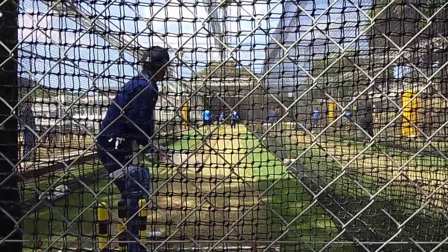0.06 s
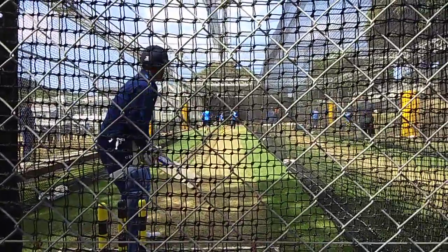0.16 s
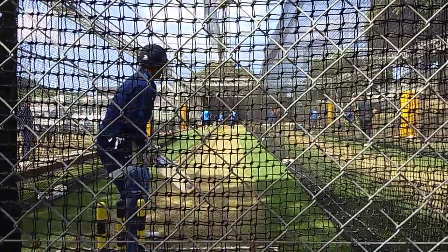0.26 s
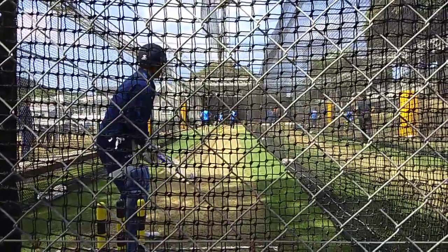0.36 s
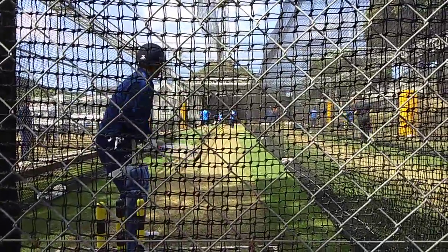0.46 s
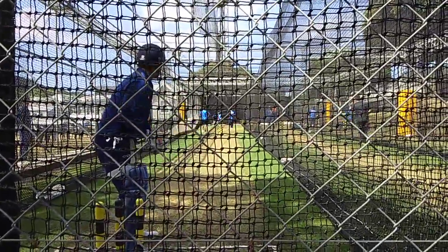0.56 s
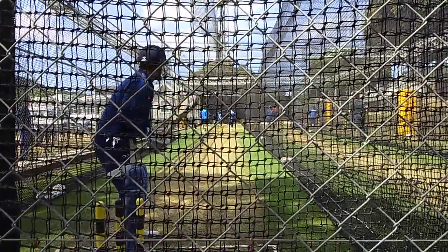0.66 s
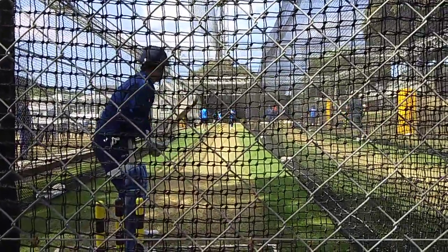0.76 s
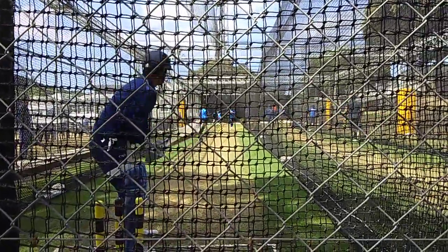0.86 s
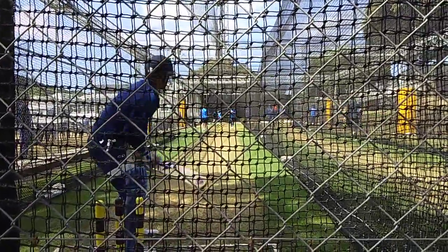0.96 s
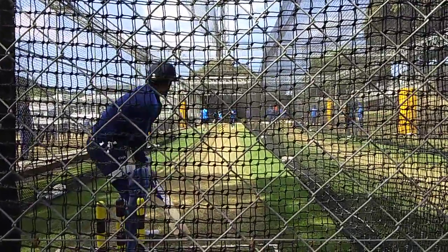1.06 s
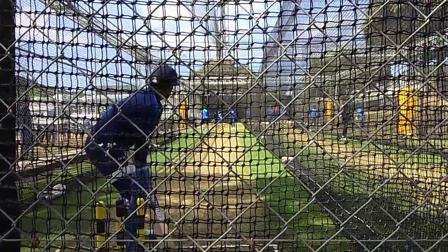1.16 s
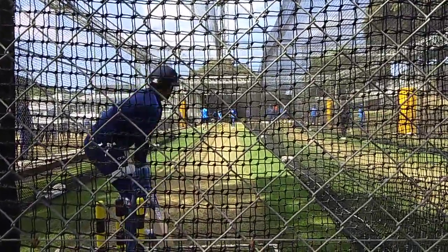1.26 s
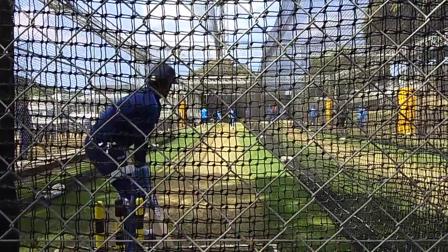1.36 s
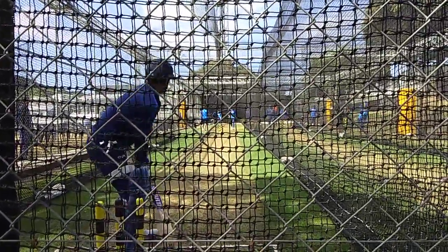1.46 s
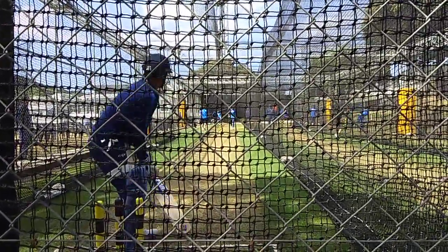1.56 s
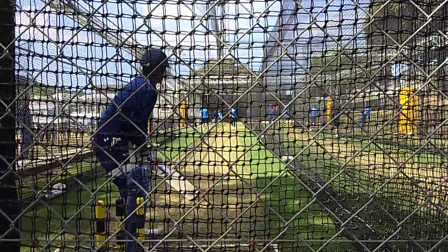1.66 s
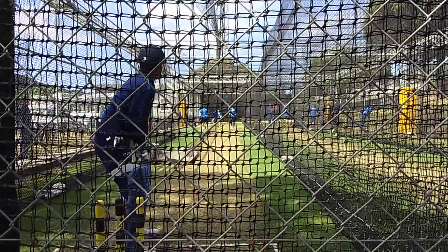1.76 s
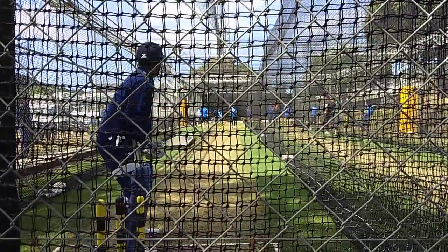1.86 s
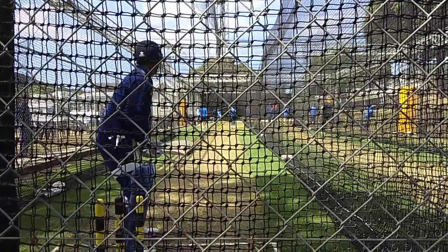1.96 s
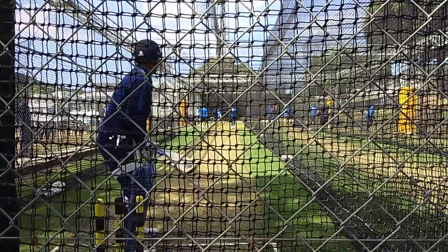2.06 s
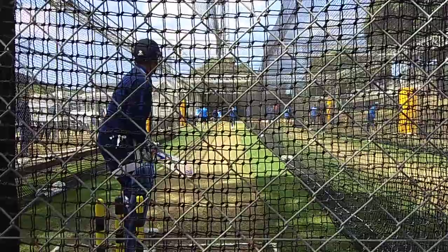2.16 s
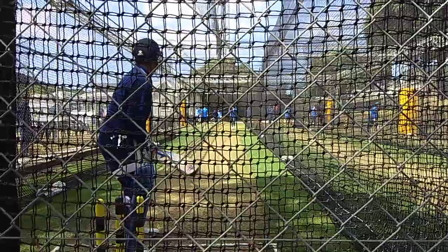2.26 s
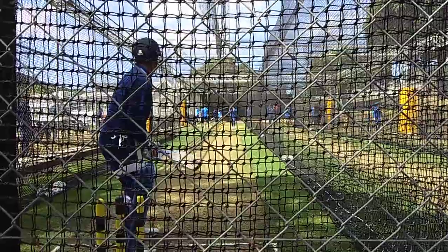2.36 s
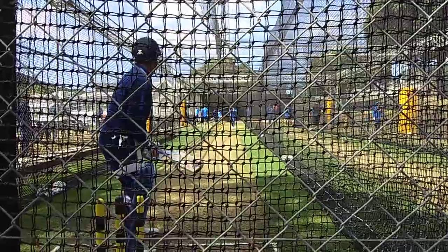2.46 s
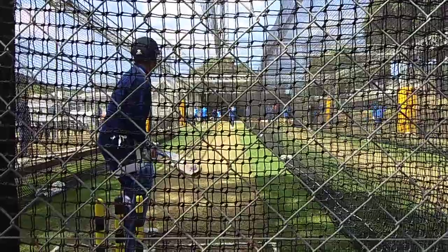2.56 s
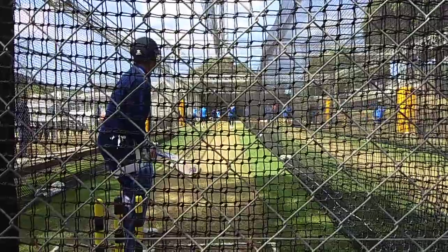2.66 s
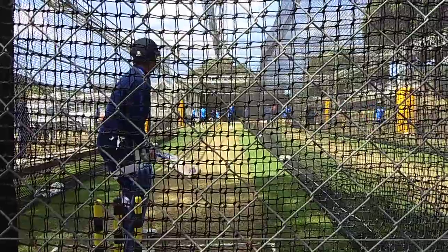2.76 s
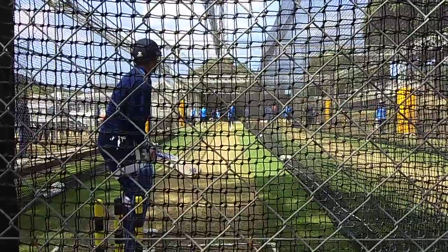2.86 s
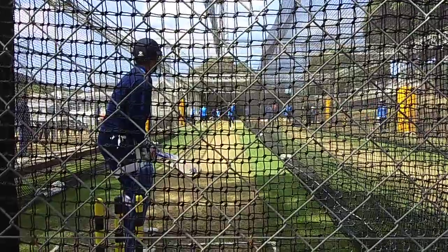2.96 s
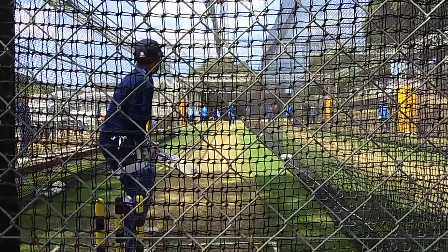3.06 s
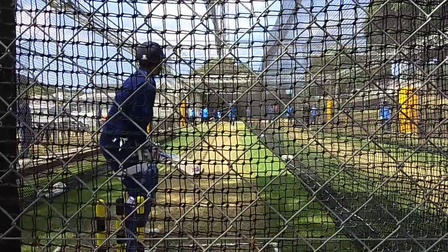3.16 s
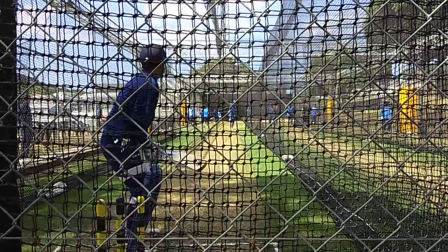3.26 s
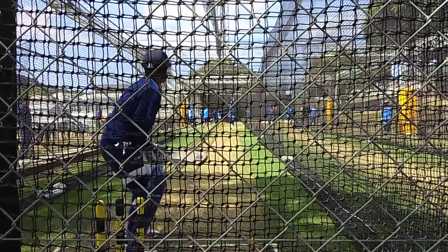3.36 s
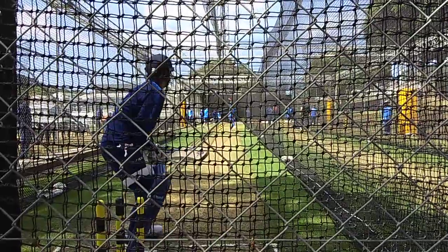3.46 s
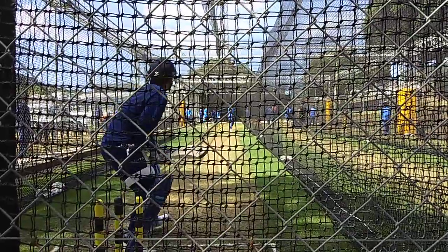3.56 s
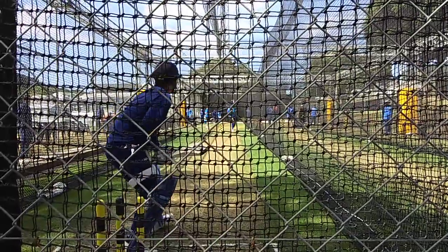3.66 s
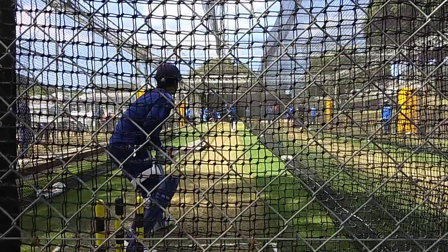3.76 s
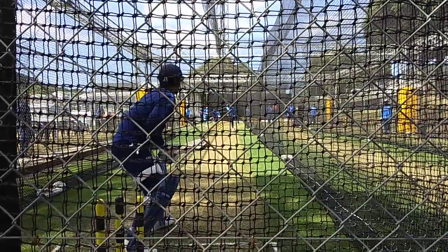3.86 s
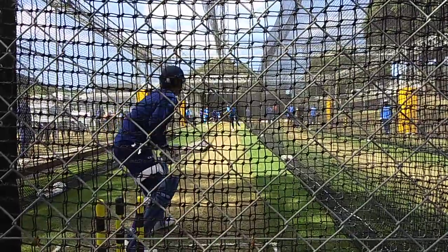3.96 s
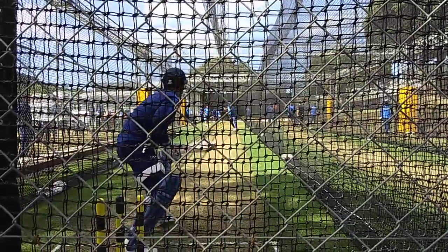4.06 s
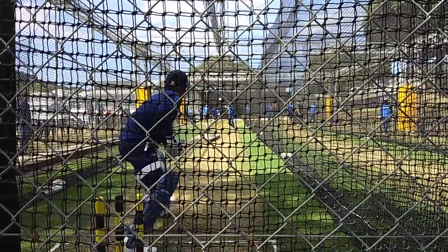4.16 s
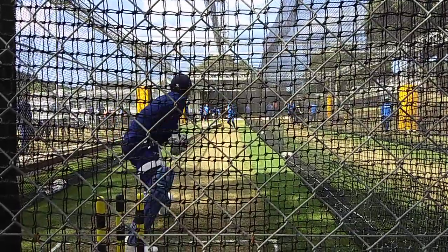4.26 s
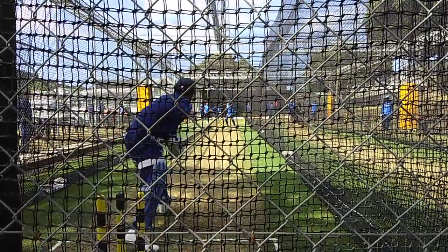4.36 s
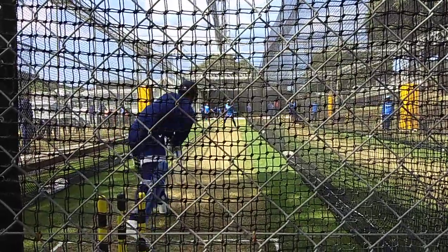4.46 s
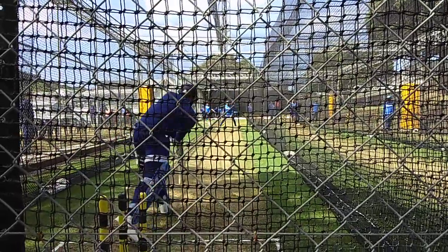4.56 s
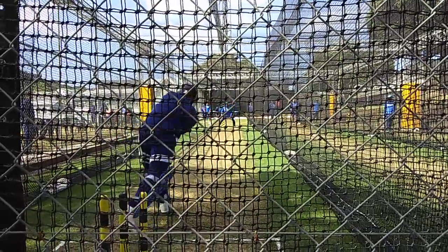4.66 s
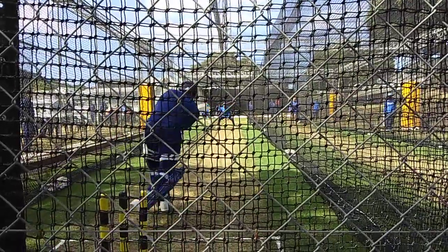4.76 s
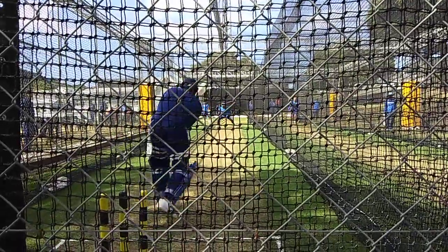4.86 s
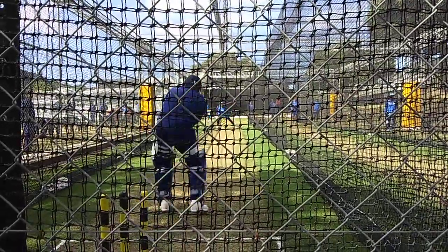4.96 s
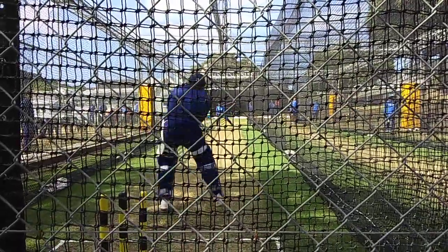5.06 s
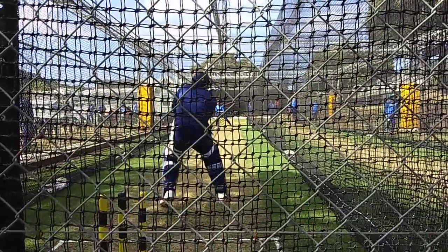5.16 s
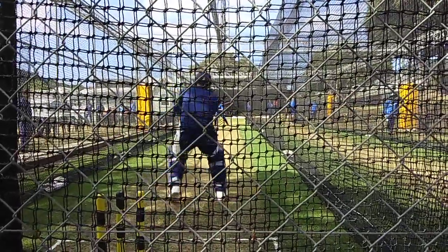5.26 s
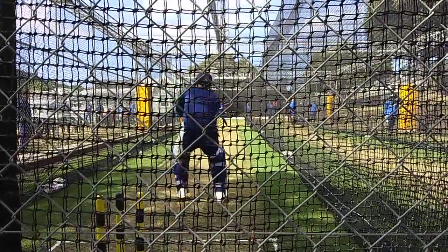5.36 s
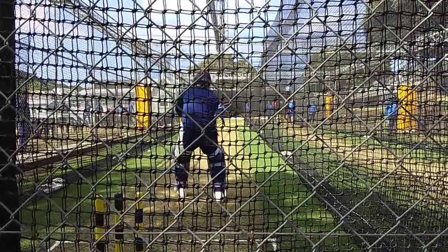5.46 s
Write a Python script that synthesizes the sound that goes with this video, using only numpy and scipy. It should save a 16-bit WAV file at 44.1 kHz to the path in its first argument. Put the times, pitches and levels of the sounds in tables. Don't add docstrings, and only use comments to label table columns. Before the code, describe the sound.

Wooden bat taps thud softly in outdoor cricket nets, then two sharp ball-on-bat cracks ring out with rattling echoes over a distant town rumble.

```python
import sys
import numpy as np
from scipy import signal
from scipy.fft import rfft, irfft, next_fast_len
from scipy.io import wavfile
from scipy.ndimage import uniform_filter1d

SR = 44100
rng = np.random.default_rng(int(sys.argv[2]) if len(sys.argv) > 2 else 0)


def log_audio(samples):
    frames = np.atleast_2d(samples).T
    limited = np.clip(frames, -1, 1)
    pcm = np.round(limited * 32767).astype(np.int16)
    wavfile.write(sys.argv[1], SR, pcm)


def level_to_linear(level):
    exponent = np.asarray(level, float) / 20
    return 10 ** exponent


N = 243431
T = np.arange(N) / SR
SPLIT_HZ = 8000
HALVES = np.array([[.5], [-.5]])


def on_log(table, hz):
    point_hz, value = np.transpose(table)
    return np.interp(np.log(np.maximum(hz, 1)), np.log(point_hz), value)


def colour(x, table, lo_hz, hi_hz):
    size = next_fast_len(N)
    hz = np.arange(size // 2 + 1) * SR / size
    gain = level_to_linear(on_log(table, hz)) * (hz >= lo_hz) * (hz < hi_hz)
    y = irfft(rfft(x, size) * gain, size)[..., :N]
    return y / np.sqrt(np.mean(y ** 2))


def walk(rate):
    hold = int(SR / rate)
    steps = np.repeat(rng.standard_normal(N // hold + 1), hold)
    return uniform_filter1d(uniform_filter1d(steps, hold), hold)[:N]


def add_ring(out, s, db, hz, rise_ms, swing, lag_ms, soft):
    start = int(s * SR) - 40
    at = np.arange(start, min(N, start + 2600))
    t = np.maximum(at / SR - s - HALVES * lag_ms / 1000, 0)
    u = t / (rise_ms / 1000)
    out[:, at] += swing * level_to_linear(db) * (u * np.exp(1 - u)) ** soft * np.sin(2 * np.pi * hz * t)


def town():
    # pitch in Hz, level in dB per Hz.
    spectrum = [(15, -50), (25, -42), (40, -23), (55, -2), (107, 1.5), (148, -7.5), (261, -2), (425, -15),
                (881, -10.5), (1360, -16), (2150, -17.5), (3050, -29), (6140, -32), (7630, -47),
                (15800, -38)]
    # pitch in Hz, how alike left and right are (1 = the same).
    likeness = [(60, .98), (290, 0.99), (640, 0.91), (1400, 0.28), (3100, 0.053), (7000, .05)]
    # pitch in Hz, left minus right in dB.
    ports = [(60, -0.5), (110, -0.5), (200, 0), (380, 0.0), (700, 0.5), (1290, 0.5), (2380, 1.0),
             (4400, 1.5), (8120, 9), (15000, 3)]
    # pitch in Hz, spread of the patches in dB.
    mottle = [(60, 3.5), (200, 5), (700, 3.5), (2000, 4.5), (4000, 3.0), (12000, 4)]
    # time in
    # seconds, level in dB.
    bustle = [(0.0, -51), (0.52, -48), (0.83, -49.5), (1.34, -47.5), (1.66, -51.5), (2.09, -39.5),
              (2.26, -50), (2.49, -47.5), (2.86, -45), (2.97, -44.5), (3.32, -50), (3.8, -49),
              (4.18, -46.5), (4.63, -47), (5.0, -50.5), (5.52, -45)]
    edges_hz = [15, 90, 450, 2800, 16000]
    # mean level in dB, share of the bustle it follows, own drift in dB, fade in dB per second.
    layers = [
        (-53.5, 0.58, 3, -0.56),
        (-49, 0.92, 2.5, -0.03),
        (-49, 0.18, 1.15, .5),
        (-61, .1, 1.7, 0.04),
    ]
    lead_ms = 0.19

    hz, _, (mid, side) = signal.stft(rng.standard_normal((2, N)), SR, nperseg=1024)
    hz, sides = hz[:, None], np.array([1, -1])[:, None, None]
    like = np.clip(on_log(likeness, hz), 0, 1)
    pair = mid * np.sqrt(1 + like) + sides * side * np.sqrt(1 - like)
    pair = pair * level_to_linear(on_log(spectrum, hz) + sides * on_log(ports, hz) / 2)
    pair = pair * np.exp(1j * np.pi * sides * hz * lead_ms / 1000)
    patches = uniform_filter1d(rng.standard_normal(mid.shape), size=3, axis=0)
    patches = uniform_filter1d(patches, size=4, axis=1)
    pair = pair * level_to_linear(on_log(mottle, hz) * patches / patches.std())

    bustle_db = np.interp(T, *np.transpose(bustle))
    bustle_db = bustle_db - bustle_db.mean()
    out = 0
    for lo, hi, (db, share, drift_db, fade_db) in zip(edges_hz, edges_hz[1:], layers):
        part = signal.istft(pair * (hz >= lo) * (hz < hi), SR, nperseg=1024)[1][:, :N]
        level_db = db + share * bustle_db + drift_db * walk(5.44) - fade_db * (T - T.mean())
        out = out + part / np.sqrt(np.mean(part ** 2)) * level_to_linear(level_db)
    return out


def insect():
    # time in seconds, level in dB.
    song = [(0, -78), (.3, -81), (.9, -67), (1.1, -63), (1.8, -67.5), (2.1, -66.5), (3, -72), (5.52, -76)]
    line = signal.lfilter(*signal.iirpeak(3580, 60, fs=SR), rng.standard_normal((2, N)))
    return line / line.std() * level_to_linear(np.interp(T, *np.transpose(song)) + 6.1 * walk(7.3) - 3.5)


def footsteps():
    # time in seconds, peak in dB, thud pitch in Hz.
    steps = [(0.016, -35, 290), (0.254, -37.5, 109), (0.359, -37, 108), (0.466, -35.5, 93),
             (0.54, -36, 58.7), (0.572, -34, 260), (0.94, -35.5, 255), (1.111, -38.5, 246),
             (1.466, -34.5, 255), (1.59, -40, 312), (1.747, -33.5, 170), (2.602, -38, 300),
             (2.821, -24, 129), (2.954, -33.5, 257), (3.008, -37, 177), (3.043, -33, 190), (3.30, -41, 62),
             (3.349, -33.5, 189), (3.681, -32.5, 175), (3.876, -37.5, 197), (3.944, -35, 127),
             (4.135, -35, 228), (4.314, -39, 110), (4.382, -33, 109), (4.914, -36, 134),
             (5.017, -38.5, 129), (5.163, -35.5, 119), (5.237, -34, 121), (5.276, -34, 197),
             (5.49, -38, 131)]
    out = np.zeros((2, N))
    for s, db, hz in steps:
        add_ring(out, s + .003, db, hz, rise_ms=1.05 * 1000 / hz, swing=-1, lag_ms=-.1, soft=1.8)
    return out


def taps():
    # time in seconds, peak in dB, thud pitch in Hz, rise in ms, blade ring in dB over the thud.
    lanes = [
        [(1.2356, -8, 285, 2.6, -26), (2.7852, -9.5, 180, 2.9, -40), (4.5436, -18, 255, 2.6, -40)],
        [(2.0189, -9, 315, 2.9, -12), (1.9522, -26, 320, 1.8, 2), (2.7945, -8, 290, 2.6, -15),
         (3.5712, -19, 275, 2.8, -24)],
    ]
    lane_lags_ms = [
        0.13,
        -0.2,
    ]
    out = np.zeros((2, N))
    for lag_ms, lane in zip(lane_lags_ms, lanes):
        for s, db, hz, rise_ms, blade_db in lane:
            add_ring(out, s, db, hz, rise_ms, -1, lag_ms, soft=2.8)
            add_ring(out, s, db + blade_db, 781, 1.17, -1, lag_ms, soft=0.76)
    return out


def ground_return(thuds):
    t = T[:int(.4 * SR)]
    same, other = rng.standard_normal((2, len(t)))
    returns = same + 0.15 * other * np.array([[1], [-1]])
    returns = returns * level_to_linear(-60 * t / 0.31) * (t > .008)
    return thuds + level_to_linear(-41) * signal.fftconvolve(thuds, returns, axes=1)[:, :N]


def lane_treble():
    # pitch in Hz, level in dB per Hz.
    colours = [
        [(1180, -30), (2000, -4.5), (3730, -14.5), (4670, -14), (5090, -16), (6100, -7.5), (7510, -22.5),
         (10700, -5.5), (12200, -7.5), (14900, -5.5), (15800, -6)],
        [(1180, -36), (2000, 2.5), (3360, 3.5), (4060, 2), (4790, 0.5), (6480, -1.5), (8260, -17), (10200, -5),
         (12500, -8), (14100, 2.5), (15800, 1)],
    ]
    noise = rng.standard_normal((2, 2, N))
    mids = [colour(noise[0], lane, 2000, SPLIT_HZ) for lane in colours]
    tops = [colour(noise[1], lane, SPLIT_HZ, SR / 2) for lane in colours]
    return mids, tops


def hiss_bursts(mids, tops):
    # middle in seconds, mid band in dB, its pitch in Hz, above 8 kHz in dB,
    # left minus right in dB.
    snaps = [(1.239, -57.5, 5400, -61, 8), (1.670, -52.5, 4900, -51, 3), (1.59, -70, 3600, -57, 3),
             (2.128, -31.5, 3300, -18, 7), (2.135, -24.5, 5530, -18, 12), (2.52, -59.5, 5500, -60, 6),
             (2.80, -55, 4000, -55, 2.5), (4.065, -48, 4060, -44, 9.5), (4.17, -65, 4000, -62, 7),
             (4.488, -41, 4500, -70, 6), (4.543, -50, 4930, -39.5, 15), (4.611, -22.5, 5700, -28, 17.5),
             (4.613, -34.5, 2300, -17, 8.5), (4.780, -45, 3830, -51.5, 7)]
    # middle in seconds, length in ms, mid band in dB, above 8 kHz in dB, left minus right in dB.
    long_bursts = [(1.75, 140, -65, -62, 8), (1.965, 83, -58.5, -56, 6), (2.022, 37, -54, -49.5, 2),
                   (2.07, 130, -60, -62, 5), (3.19, 79, -64, -63, 9), (4.51, 90, -54.5, -55, 13),
                   (5.22, 43, -51, -47.5, 13), (5.30, 120, -60.5, -60, 7)]
    bursts = []
    for s, db, hz, top_db, pan_db in snaps:
        length_ms = min(5.5 - 0.54 * max(db, top_db), 32)
        bursts.append((s, length_ms, db, hz, top_db, pan_db))
    bursts += [(s, length_ms, db, 4900, *rest) for s, length_ms, db, *rest in long_bursts]

    out = np.zeros((2, N))
    for s, length_ms, mid_db, hz, top_db, pan_db in bursts:
        lane = int(s > 4.4)
        at = np.flatnonzero(np.abs(T - s) < length_ms / 2000)
        shape = np.maximum(np.cos(np.pi * (T[at] - s) * 1000 / length_ms), 0) ** 0.63
        peak = signal.iirpeak(hz, 1.7, fs=SR)
        ring = signal.lfilter(*peak, signal.lfilter(*peak, mids[lane][:, at]))
        middle = ring / ring.std() * level_to_linear(mid_db + 0.63 * pan_db * HALVES)
        top = tops[lane][:, at] * level_to_linear(top_db + pan_db * HALVES)
        out[:, at] += shape * (middle + top)
    return out


def knocks():
    # time in seconds, peak in dB, ring pitch in Hz, rise in ms, left port late by ms.
    rows = [(1.662, -45.5, 5050, 3.5, .005), (1.862, -39, 850, 1.3, -0.29), (2.155, -13.5, 750, .6, -0.34),
            (2.158, -14, 1510, 1.2, -0.28), (2.1945, -9, 780, 0.52, -0.39),
            (2.2083, -19.5, 720, 1.9, -0.14), (2.219, -22, 800, 0.61, -.13),
            (2.2083, -17, 1480, 1.9, -0.18), (2.7925, -29, 694, 1.8, -0.21), (2.8043, -22, 300, 3.5, -.1),
            (3.869, -39.5, 700, 1.4, -.15), (4.696, -21, 1250, 0.79, .09), (4.7096, -21.5, 885, 0.9, .087),
            (4.7104, -20, 1100, 1.25, .01), (4.7725, -31.5, 675, 2.6, .01), (4.907, -39, 777, 2.2, .01)]
    out = np.zeros((2, N))
    for s, db, hz, rise_ms, lag_ms in rows:
        add_ring(out, s, db, hz, rise_ms, -1, lag_ms, soft=1.3)
    return out


def strike(out, rings, s, swing, lag_ms, soft):
    for hz, db, rise_ms, late_ms in rings:
        treble_late_ms = .12 * (hz > 3000)
        add_ring(out, s + late_ms / 1000, db, hz, rise_ms, swing, lag_ms + treble_late_ms, soft)


def cracks():
    # pitch in Hz, peak in dB, rise in ms, late by ms.
    far_bat = [(1310, -7, 0.31, 0.15), (950, -5, 1, 1.7), (1940, -13.5, 1.7, 0.57), (2440, -18.5, .8, .2),
               (6360, -13, 0.62, .6), (4700, -22, 1.14, .4)]
    buckle = [(3510, -31, 1.2, 0), (5200, -42, 0.62, 0.24), (7950, -34, 0.6, 0.038)]
    spikes = [(2350, -21.5, .42, 0.29), (4000, -31, 0.57, 0.084), (1520, -22, 0.58, 4.9),
              (3730, -30.5, 0.5, 4.2)]
    bounce = [(745, -18.5, 1, 0), (2030, -24.5, 0.55, 0.031), (3760, -18, 0.15, .3)]
    near_bat = [(260, -12, 2.6, 0), (730, 0, .85, .8), (1400, -9, .8, .9), (2700, -15, .3, 1.2),
                (4200, -12, .5, 1.2)]
    out = np.zeros((2, N))
    strike(out, far_bat, 2.1326, swing=-1, lag_ms=-.37, soft=1.2)
    strike(out, buckle, 4.0592, swing=1, lag_ms=-.32, soft=1.6)
    strike(out, spikes, 4.4818, swing=-1, lag_ms=.16, soft=1.2)
    strike(out, bounce, 4.5421, swing=1, lag_ms=.14, soft=1.5)
    strike(out, near_bat, 4.6153, swing=-1, lag_ms=.12, soft=1.6)
    return out


def tail_gains(band):
    starts_s = [
        2.14,
        4.627,
    ]
    # late by seconds, level in dB, build-up in seconds.
    walls = [
        [(.003, 0, .008), (.08, -2.5, 0.037), (.23, -18, .03)],
        [(0, 0, 0.011), (.075, -3, .02), (.2, -24, .04)],
    ]
    # first level in dB, seconds
    # to fall 60 dB, change at the stand in dB, change at the building in dB.
    scatter = [
        [(-23, 0.37, -0.5, -7), (-22.5, 0.37, -2.5, 1), (-27, 0.41, -17, -14), (-23.5, 0.3, -20, -25)],
        [(-29.5, 0.3, 1.5, -1.5), (-30, 0.24, -0.5, -8), (-38, 0.6, -6.5, -4), (-36.5, 0.39, -6.5, -20)],
    ]
    gains = []
    for s, lane_walls, bands in zip(starts_s, walls, scatter):
        first_db, t60, *change_db = bands[band]
        total = 0
        for (late, db, build), wall_db in zip(lane_walls, [0] + change_db):
            t = T - s - late
            fall_db = 60 * np.maximum(t, 0) / t60
            gain = np.clip(t / build + 1, 0, 1) * level_to_linear(first_db + db + wall_db - fall_db)
            total = total + gain ** 2
        gains.append(np.sqrt(total))
    return gains


def stands():
    # pitch in Hz, level in dB per Hz.
    echo_colours = [
        [(59, -51), (100, -29), (225, -2), (263, -11.5), (326, 0), (446, -9.5), (618, -2), (989, -4), (1490, 2),
         (1720, -2.5), (3000, -27.5), (3900, -56), (6600, -120)],
        [(59, -52), (100, -15.5), (245, 0), (392, -0.5), (433, -6), (544, -3), (584, -3), (1260, -3),
         (1750, -17.5), (2600, -7.5), (3000, -24), (3900, -53), (6600, -120)],
    ]
    when, side, size, sign = rng.random((16000, 4)).T
    clicks = np.zeros((2, N))
    at = (when * (N - 50) + 25).astype(int)
    lag = (0.00039 * SR * (side - .7)).astype(int)
    strength = level_to_linear(np.minimum(-2.0 * np.log(size), 8)) * np.sign(sign - .5)
    np.add.at(clicks[0], at + lag, strength)
    np.add.at(clicks[1], at - lag, strength)
    low = sum(g * colour(clicks, e, 60, 950) for g, e in zip(tail_gains(0), echo_colours))
    high = sum(g * colour(clicks, e, 950, 3000) for g, e in zip(tail_gains(1), echo_colours))
    return low + high


def bright_tails(mids, tops):
    middle = sum(m * g for m, g in zip(mids, tail_gains(2)))
    top = sum(t * g for t, g in zip(tops, tail_gains(3)))
    return middle * level_to_linear(2.4 * HALVES) + top * level_to_linear(8.1 * HALVES)


def scene():
    mids, tops = lane_treble()
    background = town() + insect()
    thuds = ground_return(footsteps() + taps())
    blows = thuds + hiss_bursts(mids, tops) + knocks() + cracks()
    return background + blows + stands() + bright_tails(mids, tops)


def thin(x):
    # pitch in Hz, share of its neighbours' strength that a line needs to stay.
    thrift = [(600, 0.054), (1500, 0.13), (6500, 0.3), (7500, 0.85), (12000, 1.14), (14500, 0.67)]
    hz, _, z = signal.stft(x, SR, window="cosine", nperseg=1024)
    near = np.sqrt(uniform_filter1d(np.abs(z) ** 2, size=12, axis=1))
    excess = np.abs(z) / (near + 1e-12) - on_log(thrift, hz)[:, None]
    keep = np.clip(excess / 0.41, 0, 1) * (hz < 15650)[:, None]
    return signal.istft(z * keep, SR, window="cosine", nperseg=1024)[1][:, :N]


def roll_off(x):
    return signal.sosfilt(signal.butter(12, 16620, fs=SR, output="sos"), x)


def record(dry):
    x = signal.sosfilt(signal.butter(2, 42, "high", fs=SR, output="sos"), dry)
    rounded = np.tanh(0.74 * x) / 0.69
    mix = np.clip(thin(rounded), -.9, .9)
    return roll_off(mix)


dry = scene()
out = record(dry)
log_audio(out)
```